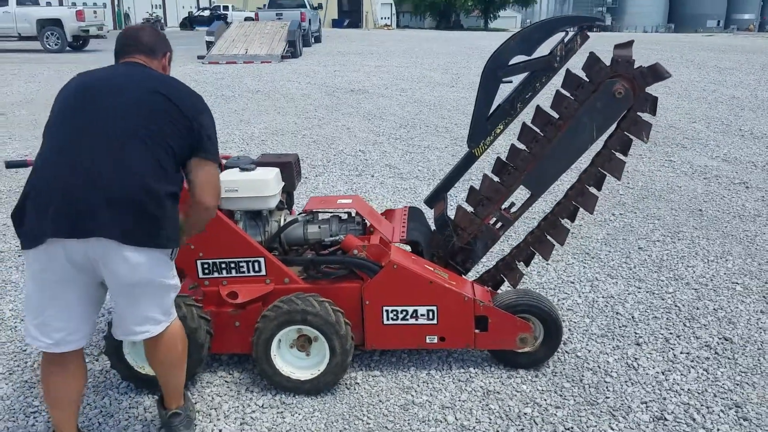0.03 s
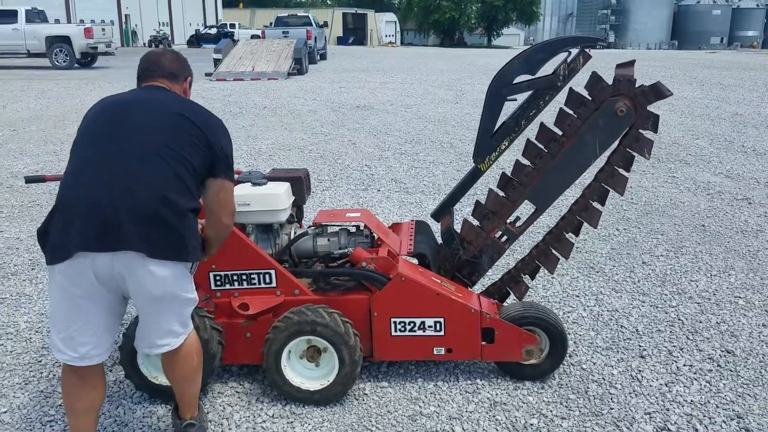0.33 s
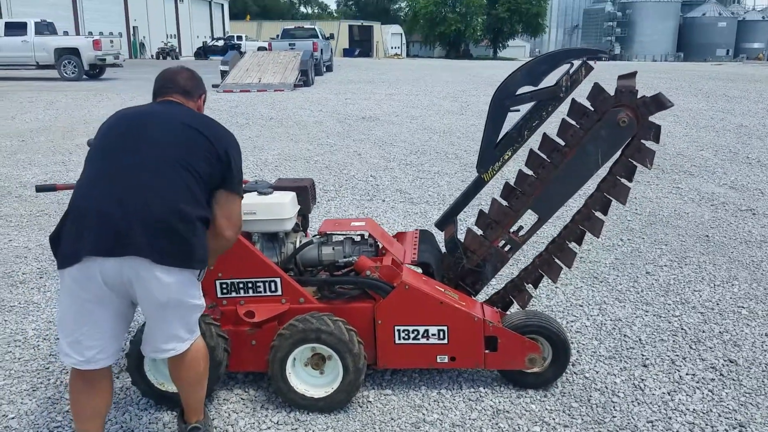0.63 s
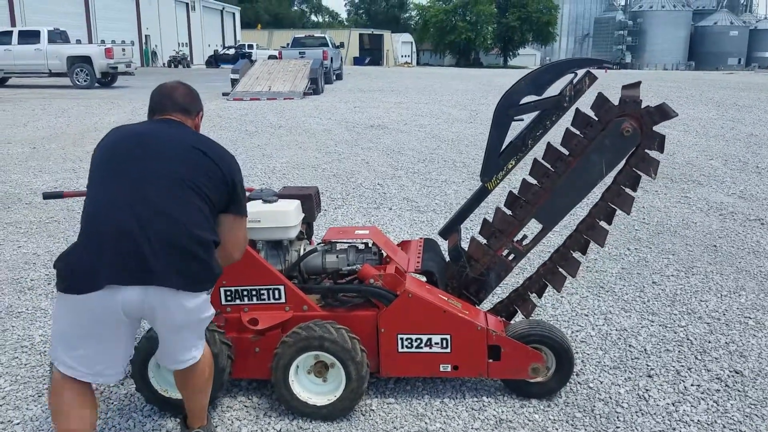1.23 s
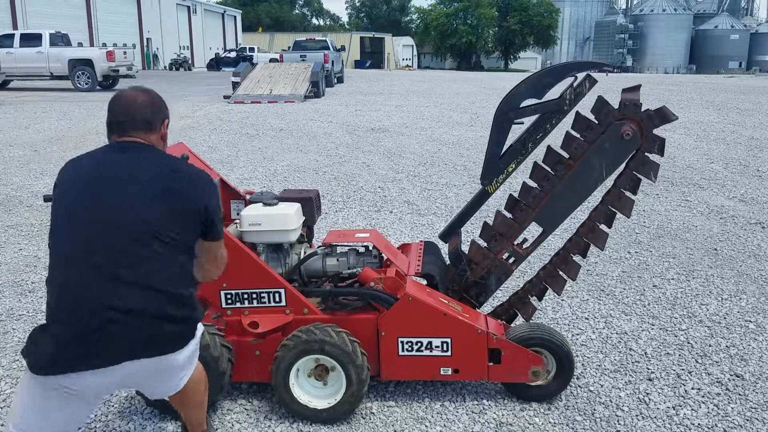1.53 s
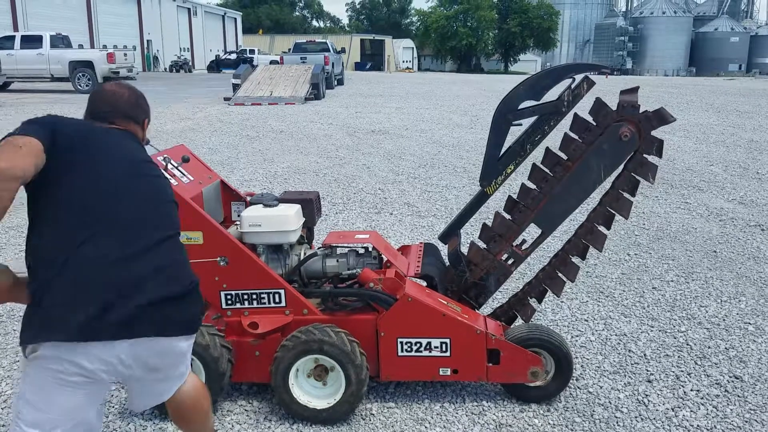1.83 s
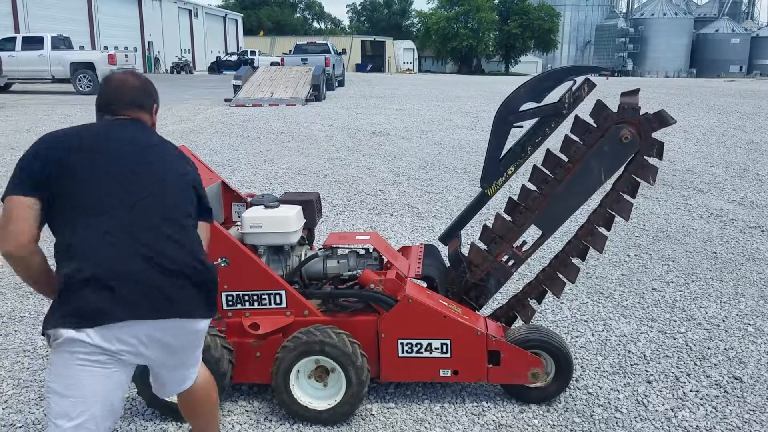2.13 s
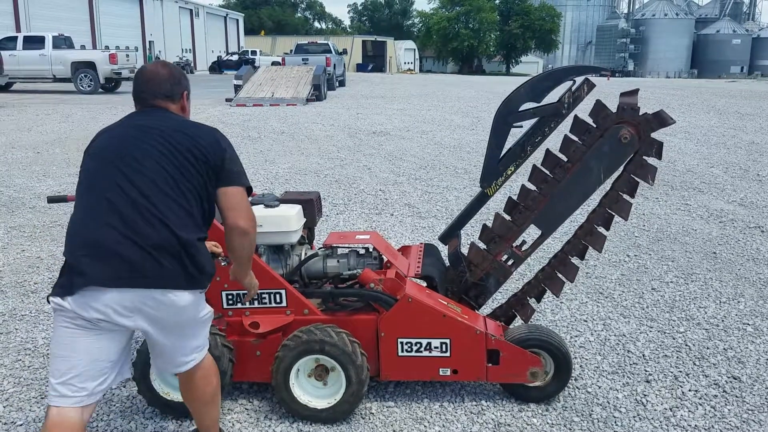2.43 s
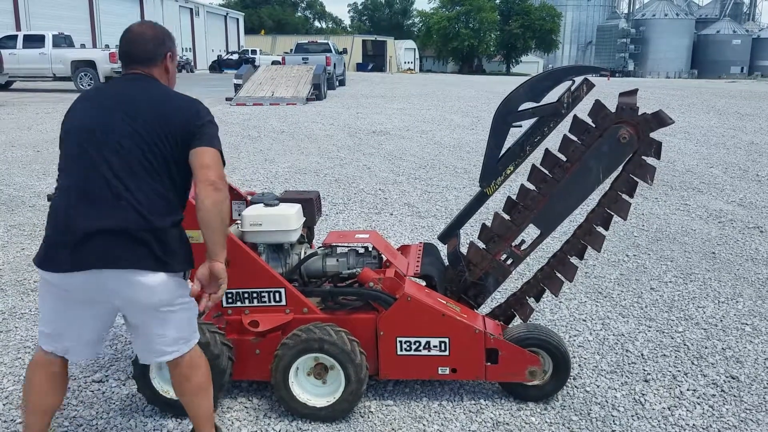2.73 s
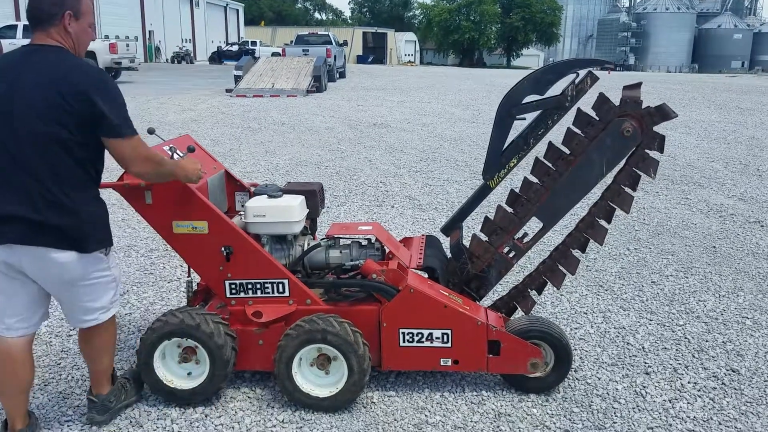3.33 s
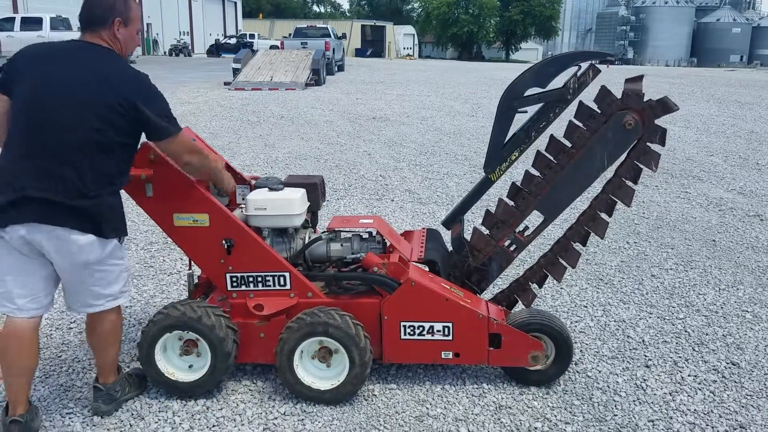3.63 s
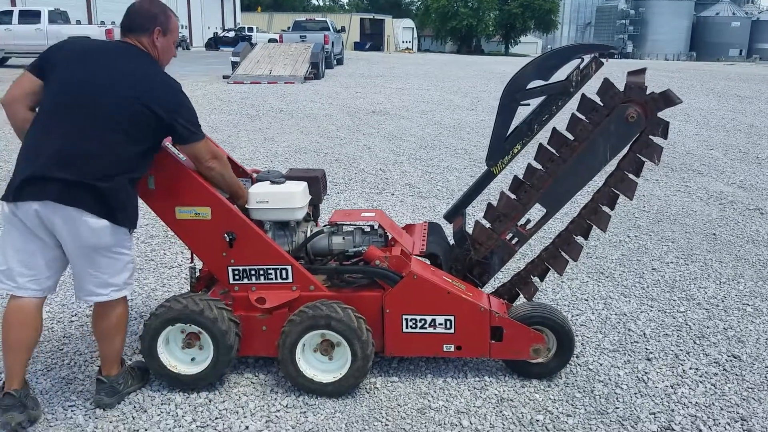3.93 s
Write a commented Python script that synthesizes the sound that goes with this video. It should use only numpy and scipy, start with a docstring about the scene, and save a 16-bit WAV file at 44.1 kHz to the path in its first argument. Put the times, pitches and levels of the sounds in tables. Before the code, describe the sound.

A trencher's small engine starts nearby in an open yard. After quiet handling and gravel scuffs, the starter clunks and its cord whirrs out; the engine barks, surges briefly with metal clanks and keeps chugging at idle.

```python
"""A starter handle knocks and shoes scuff on gravel as a trencher is readied for a pull-start.
The recoil pawls catch with a clunk that rings the housing, and the rope whirrs off its reel.
The single-cylinder four-stroke fires with a few hard, barking knocks, overshoots under load
and settles into a chugging idle. Each cycle is a thump, a combustion knock, an exhaust puff
and a clatter of valve gear, with the covers ringing along and a faint answer from the yard."""
import sys
import numpy as np
from scipy import signal
from scipy.fft import rfft, irfft, next_fast_len
from scipy.io import wavfile
from scipy.ndimage import map_coordinates

SR = 44100
rng = np.random.default_rng(int(sys.argv[2]) if len(sys.argv) > 2 else 0)


def waveform_to_disk(signal):
    """Save audio, clipped to [-1, 1], as 16-bit WAV at the path in sys.argv[1]."""
    frames = np.transpose(np.atleast_2d(signal))
    scaled = np.clip(frames, -1, 1) * 32767
    samples = np.round(scaled).astype(np.int16)
    wavfile.write(sys.argv[1], SR, samples)


N = 176400

# first firings (time [s], strength [dB], metallic knock [dB], top of the bark's glide [Hz])
FIRST_FIRINGS = [(1.875, -3, -21.5, 1770), (1.975, -1.5, -17, 1980), (2.055, -3.5, -16.5, 1978),
                 (2.122, 3.5, -19, 1980), (2.179, 1, -20, 1870), (2.233, -3, -19, 2023)]
# engine speed (time [s], firing rate [1/s])
FIRING_RATE = [(2.278, 20.52), (2.38, 21.31), (2.52, 20.66), (2.68, 19.04), (2.93, 18.02), (3.25, 18.56),
               (3.6, 18.9), (3.8, 18.46)]
# how hard the engine works (time [s], level over idle [dB])
ENGINE_EFFORT = [(1.8, -17), (1.88, -10), (2.04, 1), (2.16, 1.5), (2.3, 2), (2.45, 2.5), (2.57, 1.5),
                 (2.68, 1.5), (2.95, 0), (3.5, 1), (4, 0.5)]
# the thump is deeper while the engine catches (time [s], pitch [Hz])
THUMP_PITCH = [(1.9, 91.7), (2.5, 117.9)]
# valve gear hits (position [share of the cycle], level [dB])
VALVE_HITS = [(0.491, -33), (.75, -32)]

# one-shot cues (time [s], level [dB])
FRAME_CLANKS = [(2.28, -19), (2.331, -19), (2.378, -21), (2.425, -24), (2.519, -21), (2.556, -18),
                (2.829, -24.5), (3.213, -30.5), (3.426, -31)]  # loose steel parts
MOUNT_LURCHES = [(2.473, -33.5), (2.776, -31)]  # the engine heaves on its mounts
PAWL_CATCHES = [(.033, -27), (1.513, -8)]  # the pawls grab the flywheel
COMPRESSION_STROKES = [(1.698, -32), (1.813, -39)]  # before the engine fires
HANDLE_BUMPS = [(.378, -51), (.394, -49), (.508, -44), (.518, -51), (.639, -52)]  # handle against housing
METAL_TICKS = [(.037, -35), (1.009, -36.5)]
# friction cues (time [s], level [dB], hold [s]); the last gravel row, at 1.621 s, is a dull metal tick
REEL_RASPS = [(1.738, -41, 0.045), (1.79, -34.5, 0.022), (1.85, -34.5, 0.012), (1.897, -33, 0.023)]
DULL_SCRAPES = [(.0, -52, 0.032), (.273, -46.5, 0.0054), (.484, -56, 0.041), (.507, -50, 0.023),
                (.678, -49.5, 0.013), (.922, -52.5, 0.05), (.98, -48, 0.04), (1.002, -43.5, 0.048),
                (1.081, -52, 0.0037), (1.19, -53, 0.029), (1.228, -47.5, 0.0024), (1.478, -43.5, 0.012),
                (1.498, -35, 0.011)]  # handle and shoes
GRAVEL_SCUFFS = [(.005, -55, 0.027), (.487, -55, 0.038), (.559, -49.5, 0.011), (.639, -52, .003),
                 (.786, -62, 0.0016), (.934, -55, 0.0069), (.985, -54.5, 0.046), (1.204, -52.5, .005),
                 (1.23, -59, 0.017), (1.304, -56.5, 0.0035), (1.394, -55.5, 0.0055), (1.465, -49, 0.0098),
                 (1.621, -34.5, 0.0032)]
# fader rides (time [s], level [dB])
CRACK_RIDE = [(1.9, -36.5), (2.5, -32), (3, -33), (3.45, -35.5), (3.7, -24.5), (4, -33)]  # the exhaust's treble crack
ROPE_RIDE = [(1.5, -70), (1.53, -29), (1.6, -37), (1.68, -39.5), (1.745, -33.5), (1.81, -32), (1.83, -34.5),
             (1.86, -30.5), (1.92, -32), (2.05, -37.5)]  # rope running off the reel
RUSTLE_RIDE = [(0, -55), (.12, -57.5), (.3, -53), (.36, -74.5), (.55, -51), (.75, -69.5), (1.4, -72)]  # gripping the starter
SHUFFLE_RIDE = [(0, -93), (.38, -54.5), (.46, -71), (.62, -58), (.85, -62), (1.1, -85), (1.27, -62),
                (1.4, -85)]  # rumble of shuffling feet

# noise colours (frequency [Hz], relative spectral density [dB])
COMBUSTION_EQ = [(100, -31), (220, 5), (450, 3.5), (750, -7), (1150, -3), (1450, -14), (1800, -4),
                 (2600, -10), (5500, -17.5), (8000, -27.5), (15000, -23.5)]
EXHAUST_EQ = [(120, -13), (650, -1.5), (900, -6.5), (1700, 2), (2700, -7), (3800, -12.5), (5200, -6),
              (6000, -11.5), (7500, -22.5), (11000, -27.5), (13000, -19), (15500, -23)]
CRACK_EQ = [(3000, -30), (7000, -7.5), (10000, -5.5), (11500, -6.5), (13000, 3.5), (15500, 0.5)]
BLOCK_EQ = [(40, -90), (130, -20), (230, -2), (440, 0), (680, -8.5), (850, -5), (1300, -2), (1850, -2),
            (2250, -7.5), (2800, -14), (3700, -16), (5000, -22.5), (7500, -29), (15000, -29)]
ROAR_EQ = [(70, -29), (140, -10.5), (210, 4), (330, -3.5), (550, 2), (820, -16), (1200, -15), (2200, -33),
           (5000, -53), (12000, -85)]
KNOCK_EQ = [(150, -0.5), (650, -12), (900, -4), (1600, -4), (2350, -7.5), (3000, -9.5), (3600, -16.5),
            (4300, -9), (6000, -16.5), (7200, -27), (15000, -29.5)]
CLUNK_EQ = [(40, -60), (90, -46), (180, -9), (300, -4), (500, 2.5), (1100, 2), (1400, -5.5), (2300, -5),
            (2900, -15.5), (4000, -15), (5800, -20), (8000, -36), (15000, -33.5)]
RASP_EQ = [(300, -4), (1700, 5), (3000, -2.5), (5500, -3), (8000, -14.5), (15000, -11)]
SCRAPE_EQ = [(60, -31), (200, -4), (520, -0.5), (850, -7), (1200, -7), (1900, -4.5), (2700, -20.5),
             (5500, -24.5), (9000, -38.5), (16000, -33)]
TICK_EQ = [(300, -4), (1500, -1), (5000, -8.5), (8000, -12), (11000, -12), (15000, -0.5)]
GRAVEL_EQ = [(200, -16), (1000, 5.5), (2000, 0.5), (4200, -1.5), (6000, -7), (8500, -18.5), (15000, -18)]
SHUFFLE_EQ = [(25, 1), (70, 4), (170, 1), (300, -11), (1000, -42)]
AIR_EQ = [(25, -2), (90, -1.5), (220, -24), (520, -2), (900, -15), (2000, -13.5), (4000, -19.5),
          (9000, -35), (13000, -24)]
RUSTLE_EQ = [(60, -27), (200, 3), (600, 3.5), (1200, -6.5), (2200, -12), (5000, -23.5), (15000, -52)]
YARD_EQ = [(100, -4.5), (3000, -8.5), (12000, -16.5)]
# resonances of the engine casing (frequency [Hz], width [Hz], lift [dB])
CASING_PEAKS = [(406, 30, 0.5), (593, 160, 4), (676, 100, 7.5), (1188, 180, 8), (1685, 19, 8),
                (1800, 28, -5), (2390, 32, 3), (2744, 25, 7), (4300, 180, 3.5), (5760, 140, 7.5)]
# ringing metal (frequency [Hz], relative level [dB], t60 [s])
COVER_MODES = [(340, -3.5, 0.07), (437, -0.5, 0.12), (566, -8.5, 0.042), (682.6, -1.5, 0.12),
               (1166.3, -0.5, 0.1), (1229, -4.5, 0.14), (1430, -6, 0.083), (1614, -2.5, 0.16),
               (1790, -3.5, 0.13), (1899, 1.5, 0.072), (2432, -5, 0.097)]  # engine covers
MUFFLER_MODES = [(4927, 0.5, 0.049), (5010, -4, 0.027), (5640, -9, 0.031)]  # muffler shell
STEEL_MODES = [(2760, -19, 0.056), (3120, -16.5, 0.073), (4320, -8, 0.028), (5410, -14.5, 0.036),
               (5980, -12.5, 0.029)]  # struck steel
HOUSING_MODES = [(177.5, -29.5, 0.87), (318, -14, 0.13), (484, 0, 0.076), (528, 0.5, 0.16), (680, -3, 0.13),
                 (775, -10.5, 0.1), (918, -9.5, 0.19), (1121, -8.5, 0.13), (1625, -11.5, 0.16),
                 (1837, -5.5, 0.083), (2332, -17, 0.13)]  # starter housing

# stereo width (frequency [Hz], left-right correlation [0..1])
STEREO_LIKENESS = [(100, .99), (250, .97), (500, .93), (1200, .87), (2500, .6), (5000, .64), (9000, .15),
                   (15000, 0)]
# stereo position (frequency [Hz], left minus right [dB])
STEREO_PAN = [(100, -2), (350, 0), (700, -1), (1400, -3), (2800, -2), (5500, -3.5), (10000, -10),
              (15000, -7.5)]

RUN_START_S = 2.283
EXHAUST_PHASE, RATTLE_SHARE = .175, .81  # shares of the cycle
THUMP_RISE_S, THUMP_LEAD_TURNS = .0054, .7467
BARK_SAG, BARK_GLIDE_S, BARK_RISE_S = .425, .00299, .00456
BOOM_HZ, BOOM_DECAY_S = 140, .016
YARD_T60_S, YARD_BUILD_S = .36, .023
LOW_CUT_HZ, HIGH_CUT_HZ = 36, 15950


def engine_cycles():
    """The engine's rhythm: time [s], period [s] and strength [dB] of every firing."""
    t = np.arange(round(RUN_START_S * SR), N + SR // 10) / SR
    count = np.cumsum(curve(FIRING_RATE, t)) / SR
    running = np.interp(np.arange(int(count[-1]) + 1), count, t)
    first_times, first_strength, _, _ = np.transpose(FIRST_FIRINGS)
    times = np.r_[first_times, running]
    periods = np.r_[np.diff(times), times[-1] - times[-2]]
    return times, periods, np.r_[first_strength, .3 * curve(ENGINE_EFFORT, running)]


def combustion(times, strength):
    """The body of the chug: each firing thumps the mounts and knocks through the casing."""
    out = np.zeros((2, N))
    for s, db in zip(times, vary(strength, spread_db=.5)):
        hz = curve(THUMP_PITCH, s)
        add(out, s - THUMP_LEAD_TURNS / hz, amp(db - 24.5) * thump(hz))
    knocks = cues(times - .005, vary(strength, spread_db=2.5) - 28.5, hold_s=.011)
    return out + bursts(knocks, COMBUSTION_EQ, attack_s=.002, t60=.056, peaks=CASING_PEAKS, repeat=.87)


def exhaust(times, strength):
    """Gas leaves the muffler in a puff with a bright crack on top."""
    puffs = cues(times, vary(strength, spread_db=1) - 28, hold_s=.0039)
    out = bursts(puffs, EXHAUST_EQ, attack_s=.0014, t60=.073, repeat=.29)
    crack_db = curve(CRACK_RIDE, times) + vary(strength, spread_db=3.5)
    cracks = cues(times - .001, crack_db, hold_s=.0026)
    return out + bursts(cracks, CRACK_EQ, attack_s=.0013, t60=.04)


def clatter(times, periods, strength):
    """The valve gear clacks twice a cycle over the rattle of the block."""
    effort = curve(ENGINE_EFFORT, times)
    out = np.zeros((2, N))
    for phase, db in VALVE_HITS:
        clacks = cues(times + phase * periods, db + effort + vary(strength, spread_db=4.5), hold_s=.0026)
        out += bursts(clacks, BLOCK_EQ, attack_s=.0046, t60=.069, peaks=CASING_PEAKS, repeat=.46)
    rattles = zip(times, effort - 34, RATTLE_SHARE * periods)
    return out + bursts(rattles, BLOCK_EQ, attack_s=.0085, t60=.05, peaks=CASING_PEAKS, repeat=.52)


def muffler_roar(exhaust_times):
    """While the governor holds the throttle open, the muffler roars and booms."""
    push = np.maximum(amp(curve(ENGINE_EFFORT, clock())) - 1, 0)
    booms, t = np.zeros((2, N)), clock(SR // 5)
    for s in exhaust_times:
        add(booms, s, np.sin(2 * np.pi * BOOM_HZ * t) * np.exp(-t / BOOM_DECAY_S))
    return push * (amp(-15.5) * noise(ROAR_EQ, CASING_PEAKS) + amp(-14) * booms)


def muffler_barks():
    """Each first firing barks in the muffler, whose note shoots up as the hot gas fills it."""
    out, t = np.zeros((2, N)), clock(2048)
    envelope = swell(t, BARK_RISE_S) ** 2
    glide = np.cumsum(1 - BARK_SAG * np.exp(-(t / BARK_GLIDE_S) ** 2)) / SR
    for s, _, db, hz in FIRST_FIRINGS:
        bark = amp(db + 3.5) * envelope * np.sin(2 * np.pi * hz * glide)
        add(out, s - BARK_RISE_S, pan(hz) * bark)
    return out


def steel_knocks():
    """The hard first firings ring the steel; the shaking frame clanks against the covers."""
    hits = [(s - .004, db - 1.5, .005) for s, _, db, _ in FIRST_FIRINGS]
    out = bursts(hits, KNOCK_EQ, attack_s=.0016, t60=.045, repeat=.32)
    out += bursts([(s, db - 3, .003) for s, db in FRAME_CLANKS], KNOCK_EQ, attack_s=.0006, t60=.049)
    steel_blows = [(s - .0025, db + 6) for s, _, db, _ in FIRST_FIRINGS]
    out += rings(steel_blows, STEEL_MODES, attack_s=.0049, spread_db=5.5)
    cover_blows = [(s, db - 8.5) for s, db in FRAME_CLANKS]
    return out + rings(cover_blows, COVER_MODES, attack_s=.0006, spread_db=5)


def cover_ring(times, periods, strength):
    """Combustion and exhaust each shake a ring out of the covers."""
    blows = [(s - .003 + phase * period, db - 31)
             for s, period, db in zip(times, periods, strength) for phase in (0, .25)]
    return rings(blows, COVER_MODES, attack_s=.0011, spread_db=1.5)


def muffler_pings(exhaust_times):
    """Each exhaust puff pings the muffler's shell."""
    return rings([(s, -31.5) for s in exhaust_times], MUFFLER_MODES, attack_s=.0068, spread_db=3.5)


def shudders(rows, hz):
    """The engine rocks on its mounts: one low thump for each (time [s], level [dB])."""
    out = np.zeros((2, N))
    for s, db in rows:
        add(out, s - .008, amp(db) * thump(hz))
    return out


def recoil_starter():
    """The pawls clunk and ring the housing; the rope whirrs and drags the piston over compression."""
    clunks = bursts([(s, db - 6, .011) for s, db in PAWL_CATCHES], CLUNK_EQ, attack_s=.0025, t60=.087)
    blows = [(s + .00097, db) for s, db in PAWL_CATCHES]
    housing = rings(blows, HOUSING_MODES, attack_s=.0072, spread_db=1.5)
    pulling = clock() > ROPE_RIDE[0][0]
    rope = pulling * ride(ROPE_RIDE) * noise(SCRAPE_EQ, CASING_PEAKS)
    reel = bursts(REEL_RASPS, RASP_EQ, attack_s=.0021, t60=.087)
    whirr = (rope + reel) * grit(rate_hz=300, depth_db=3.5)
    return clunks + housing + whirr + shudders(COMPRESSION_STROKES, hz=99)


def handling():
    """Foley for the grip: the handle scrapes, rustles and bumps, gravel shifts and metal ticks."""
    scrapes = bursts(DULL_SCRAPES, SCRAPE_EQ, attack_s=.0017, t60=.041, peaks=CASING_PEAKS)
    scrapes *= grit(rate_hz=350, depth_db=1)
    gravel = bursts(GRAVEL_SCUFFS, GRAVEL_EQ, attack_s=.00051, t60=.039)
    gravel *= grit(rate_hz=500, depth_db=3.5)
    rustle = ride(RUSTLE_RIDE) * noise(RUSTLE_EQ)
    bumps = rings(HANDLE_BUMPS, HOUSING_MODES, attack_s=.00038, spread_db=1)
    ticks = bursts([(s, db, .002) for s, db in METAL_TICKS], TICK_EQ, attack_s=.00046, t60=.031)
    return scrapes + gravel + rustle + bumps + ticks


def shuffling_feet():
    """A low rumble that comes and goes as the feet shuffle."""
    return ride(SHUFFLE_RIDE) * noise(SHUFFLE_EQ)


def yard_reverb(sound):
    """A short answer from the ground and the sheds."""
    t = clock(SR // 2)
    tail = noise(YARD_EQ, size=len(t)) * strike(t, YARD_BUILD_S, YARD_T60_S)
    return signal.fftconvolve(sound, tail / np.linalg.norm(tail[0]), axes=1)[:, :N]


def bursts(rows, spectrum, attack_s, t60, peaks=(), repeat=0, size=8192):
    """Noise hits (time [s], level [dB], hold [s]); 'repeat' is the share of power alike in each."""
    out, t = np.zeros((2, N)), clock(size)
    same = noise(spectrum, peaks, size)
    for s, db, hold in rows:
        envelope = np.minimum(t / attack_s, 1) * amp(db - 60 * np.maximum(t - hold, 0) / t60)
        fresh = noise(spectrum, peaks, size)
        add(out, s, envelope * (np.sqrt(repeat) * same + np.sqrt(1 - repeat) * fresh))
    return out


def rings(rows, modes, attack_s, spread_db):
    """Blows (time [s], level [dB]) ring a set of modes, each time in a new balance."""
    out, t = np.zeros((2, N)), clock(16384)
    hz, level, t60 = np.transpose(modes)
    waves = strike(t, attack_s, t60[:, None]) * np.exp(2j * np.pi * hz[:, None] * t)
    skew = width(hz) * (-1) ** np.arange(len(hz)) * np.array([[1], [-1]])  # left-right phase offset
    for s, db in rows:
        gain = pan(hz) * amp(vary(db + level, spread_db))
        phase = 2 * np.pi * rng.random(len(hz)) + skew
        add(out, s, ((gain * np.exp(1j * phase)) @ waves).real)
    return out


def noise(spectrum, peaks=(), size=N):
    """Coloured stereo noise of rms 1, placed where the machine stands."""
    hz = np.fft.rfftfreq(size, 1 / SR)
    db = along(spectrum, hz) + sum(lift / (1 + (2 * (hz - f) / w) ** 2) for f, w, lift in peaks)
    bins = amp(db) * np.exp(2j * np.pi * rng.random((2, len(hz))))
    mid, side = bins * [np.cos(width(hz)), np.sin(width(hz))]
    return unit(irfft(pan(hz) * [mid + side, mid - side], size))


def thump(hz):
    """A low sine that swells and dies at once."""
    t = clock(4096)
    return swell(t, THUMP_RISE_S) * np.sin(2 * np.pi * hz * t)


def grit(rate_hz, depth_db):
    """A rough, quickly changing gain of rms 1."""
    flutter = map_coordinates(rng.standard_normal(N), [clock() * rate_hz], order=1)
    return unit(amp(depth_db * flutter))


def swell(t, rise_s):
    """A rounded envelope that peaks at rise_s."""
    return t / rise_s * np.exp(1 - t / rise_s)


def strike(t, attack_s, t60):
    """A straight attack with an exponential tail."""
    return np.minimum(t / attack_s, 1) * amp(-60 * t / t60)


def pan(hz):
    """Left and right gains at each frequency."""
    return amp(along(STEREO_PAN, hz) / 2 * np.array([[1], [-1]]))


def width(hz):
    """Mid-side angle [rad] at each frequency."""
    return np.arccos(along(STEREO_LIKENESS, hz)) / 2


def vary(levels, spread_db):
    """Scatter levels at random."""
    return levels + spread_db * rng.standard_normal(len(levels))


def cues(times, levels, hold_s):
    """Rows for bursts that share one hold."""
    return [(s, db, hold_s) for s, db in zip(times, levels)]


def ride(rows):
    """A fader ride as a gain for every sample."""
    return amp(curve(rows, clock()))


def curve(rows, t):
    """Join (time [s], value) points by straight lines."""
    return np.interp(t, *np.transpose(rows))


def along(points, hz):
    """Join (frequency [Hz], value) points on a log axis."""
    f, v = np.transpose(points)
    return np.interp(np.log(hz + 1), np.log(f + 1), v)


def add(out, s, sound):
    """Mix a sound in at time s."""
    i = min(max(round(s * SR), 0), N)
    out[:, i:i + sound.shape[-1]] += sound[..., :N - i]


def amp(db):
    """Decibels to gain."""
    return 10 ** (np.asarray(db) / 20)


def unit(x):
    """Scale to rms 1."""
    return x / np.sqrt(np.mean(x ** 2) + 1e-20)


def clock(size=N):
    """The time of each sample."""
    return np.arange(size) / SR


def scene():
    """The machine up front, with a touch of yard, shuffling feet and a quiet bed of outdoor air."""
    times, periods, strength = engine_cycles()
    exhaust_times = times + EXHAUST_PHASE * periods
    machine = handling() + recoil_starter()
    machine += combustion(times, strength) + exhaust(exhaust_times, strength)
    machine += clatter(times, periods, strength)
    machine += muffler_roar(exhaust_times) + muffler_barks() + steel_knocks()
    machine += cover_ring(times, periods, strength) + muffler_pings(exhaust_times)
    machine += shudders(MOUNT_LURCHES, hz=69.5)
    return machine + shuffling_feet() + amp(-20.5) * yard_reverb(machine) + amp(-64) * noise(AIR_EQ)


def record(dry):
    """Master EQ: roll off the deepest bass and cut the very top."""
    size = next_fast_len(N + SR // 4)
    hz = np.fft.rfftfreq(size, 1 / SR)
    low_cut = hz ** 2 / np.sqrt(hz ** 4 + LOW_CUT_HZ ** 4)
    return irfft(rfft(dry, size) * low_cut * (hz < HIGH_CUT_HZ), size)[:, :N]


dry = scene()
out = record(dry)
waveform_to_disk(out)
```